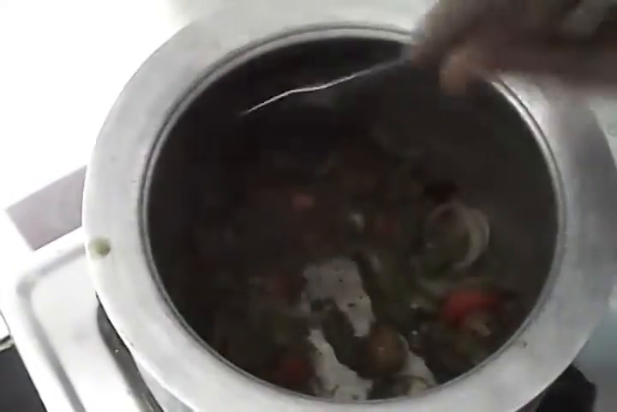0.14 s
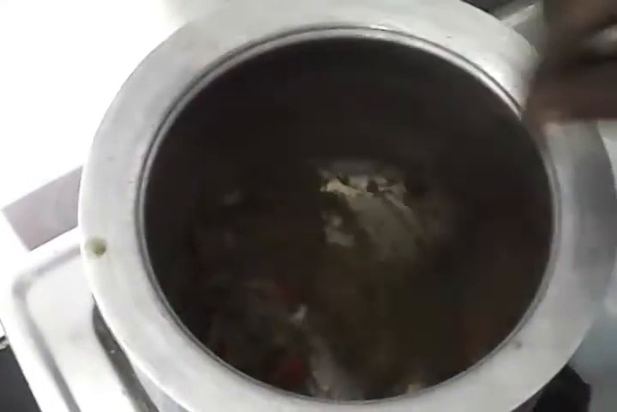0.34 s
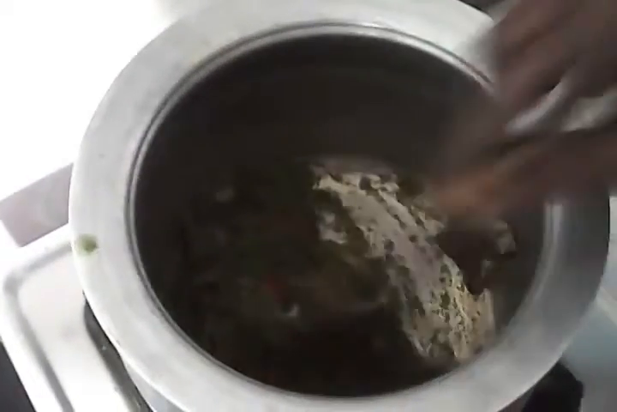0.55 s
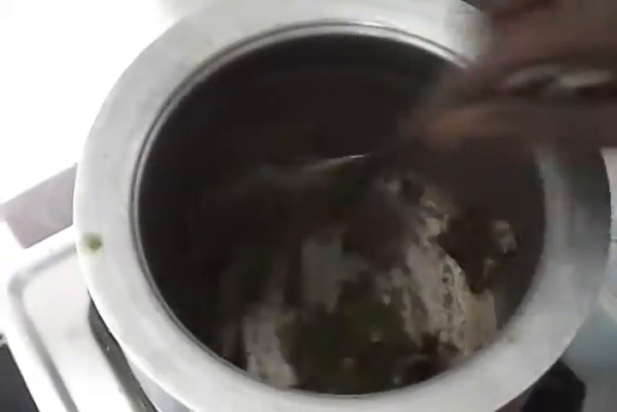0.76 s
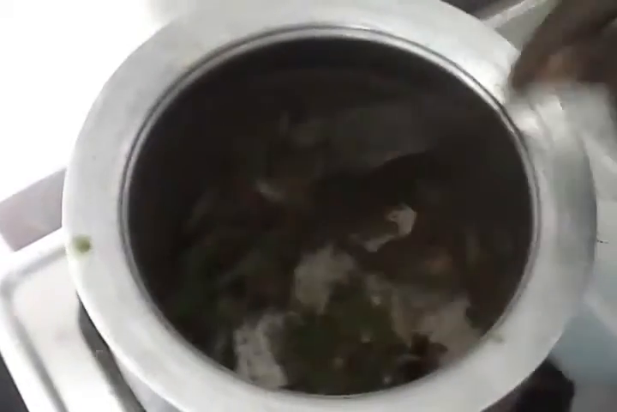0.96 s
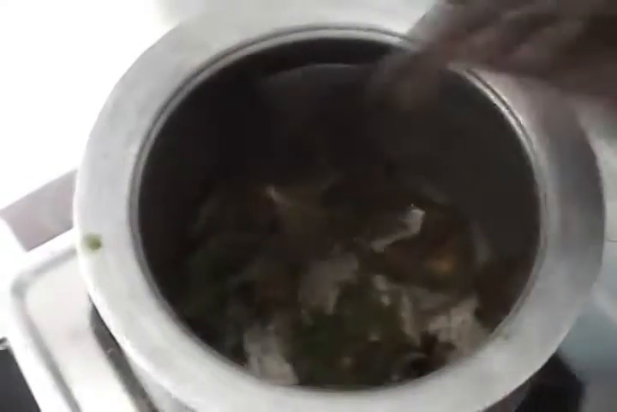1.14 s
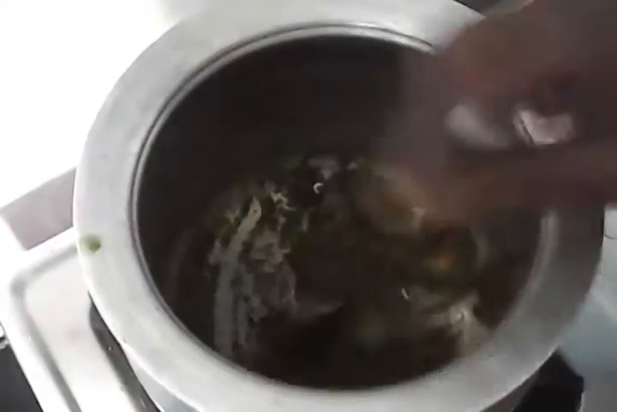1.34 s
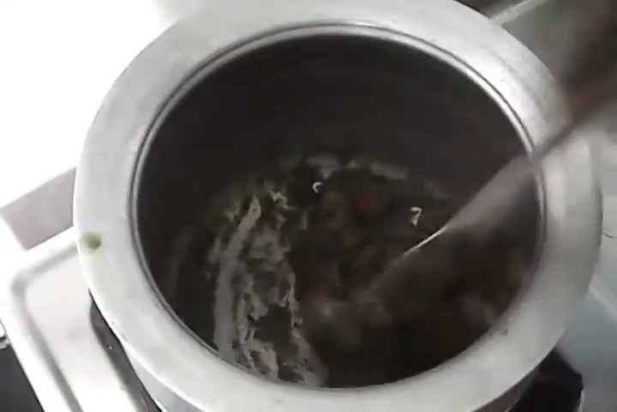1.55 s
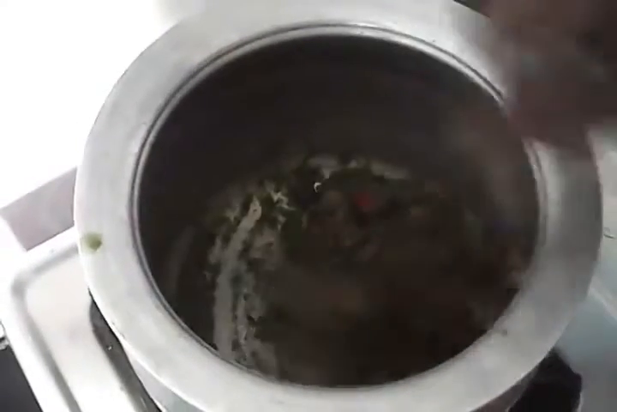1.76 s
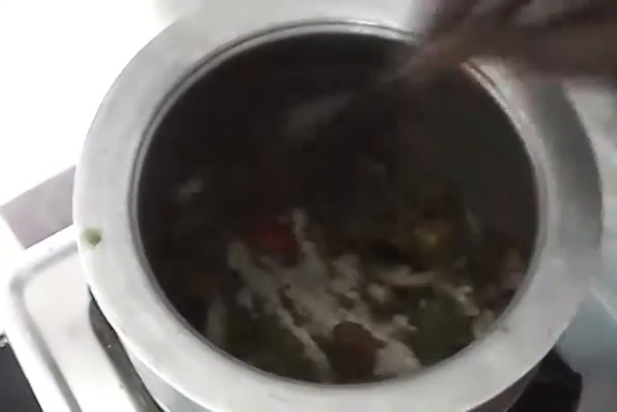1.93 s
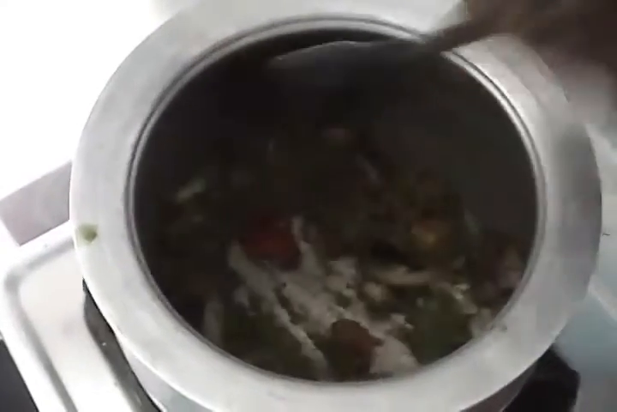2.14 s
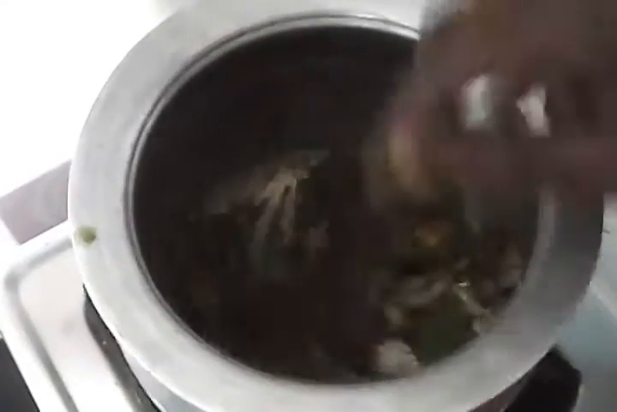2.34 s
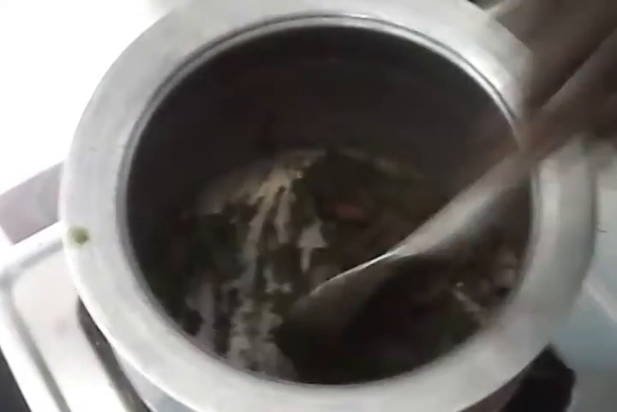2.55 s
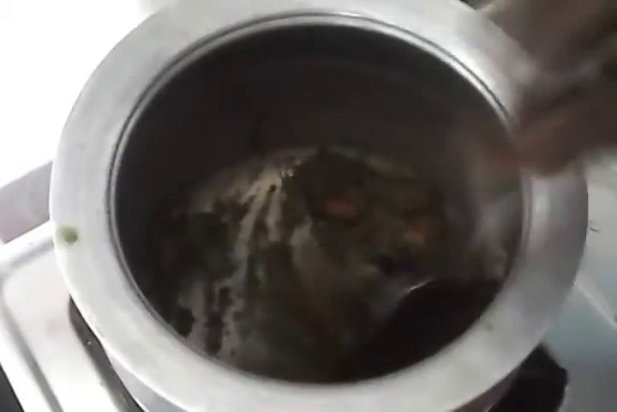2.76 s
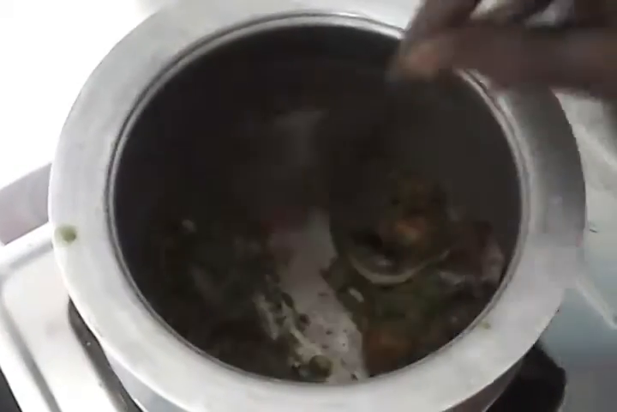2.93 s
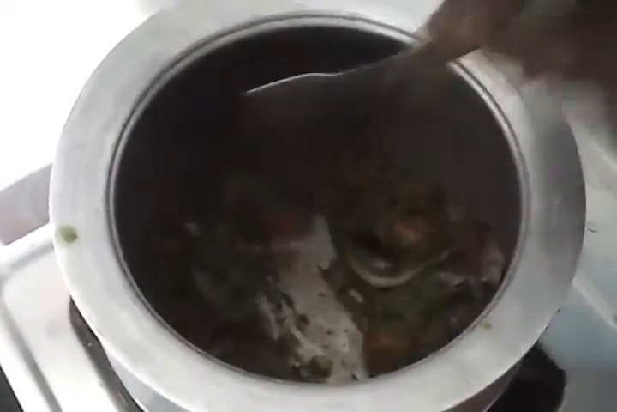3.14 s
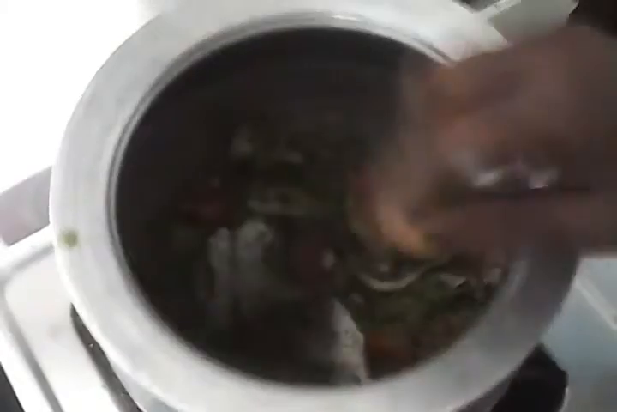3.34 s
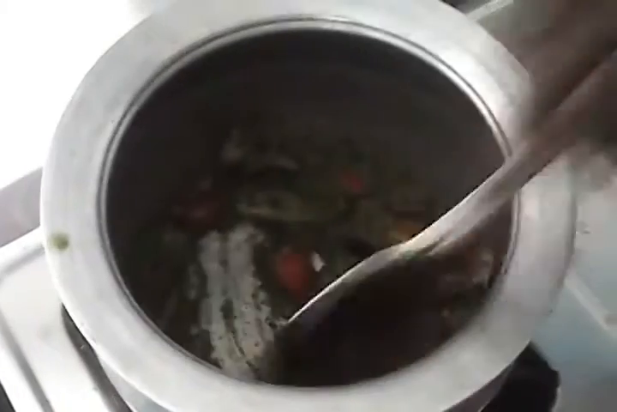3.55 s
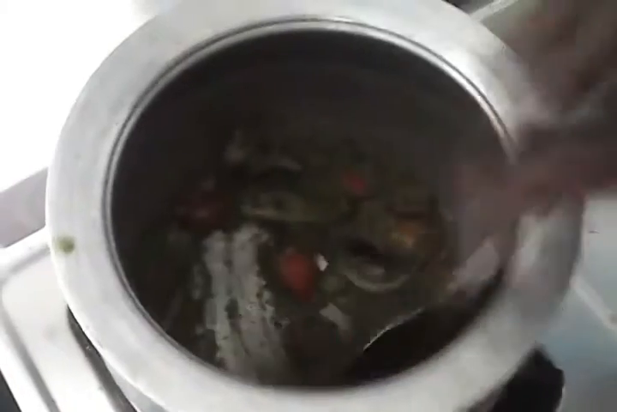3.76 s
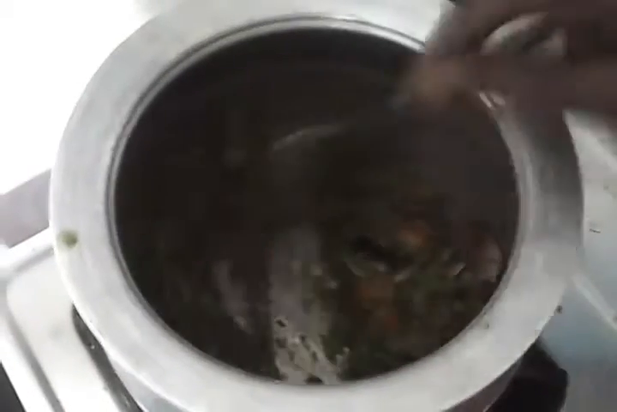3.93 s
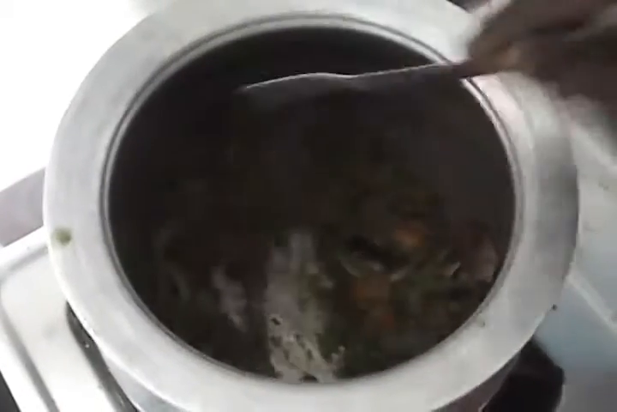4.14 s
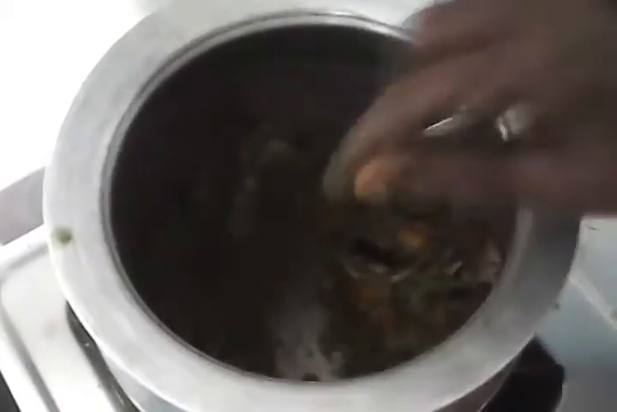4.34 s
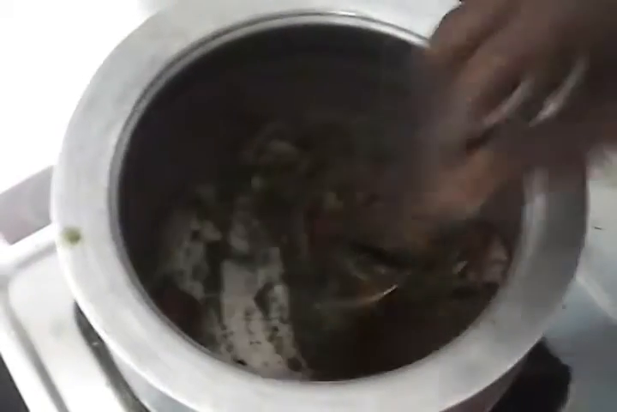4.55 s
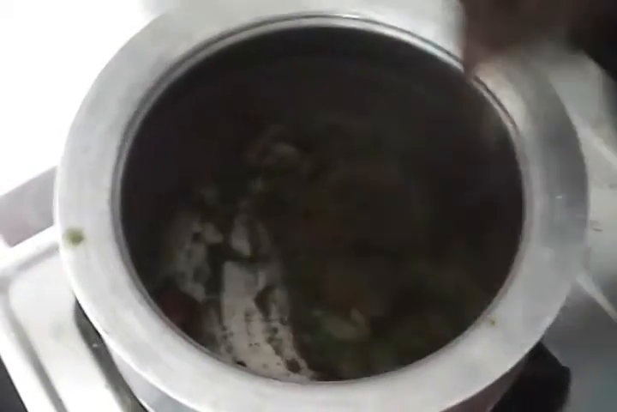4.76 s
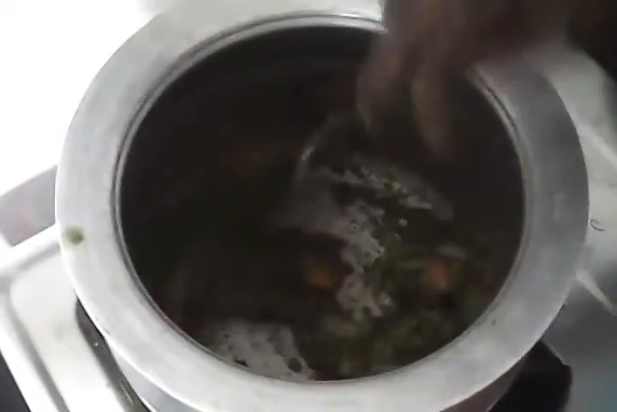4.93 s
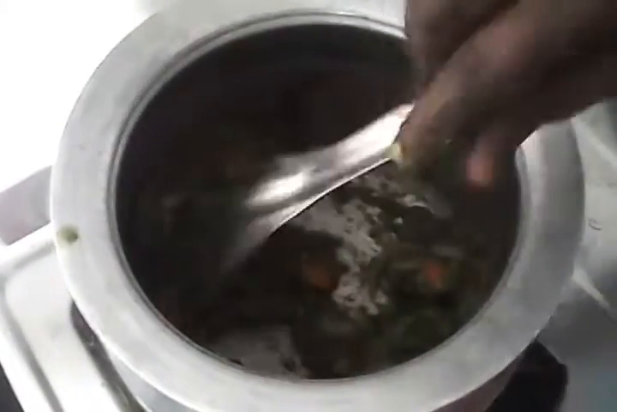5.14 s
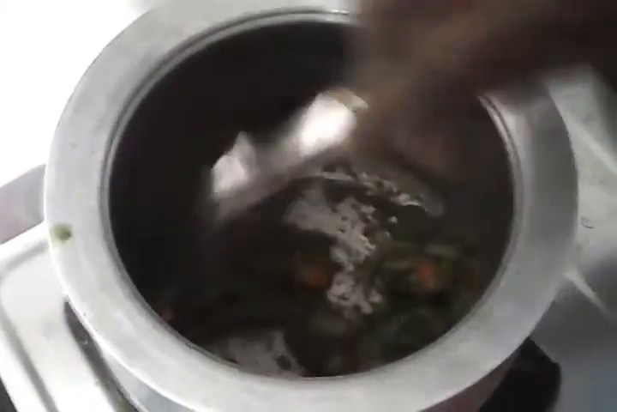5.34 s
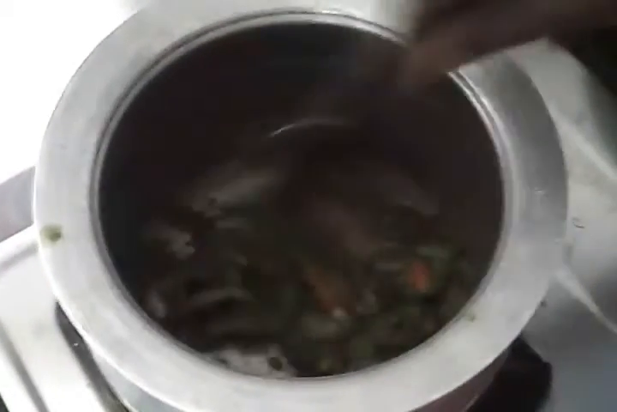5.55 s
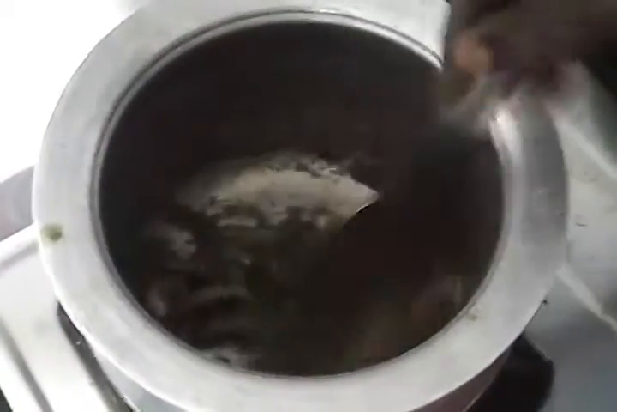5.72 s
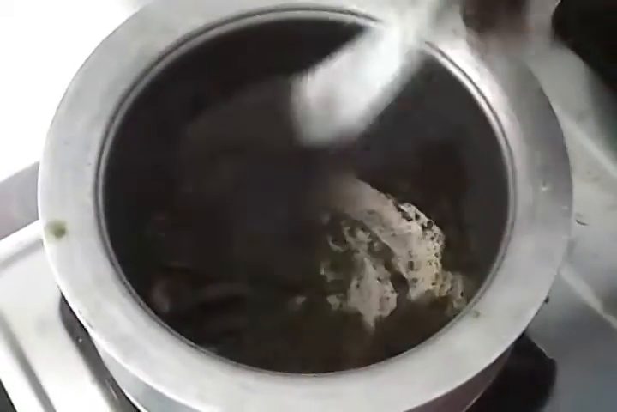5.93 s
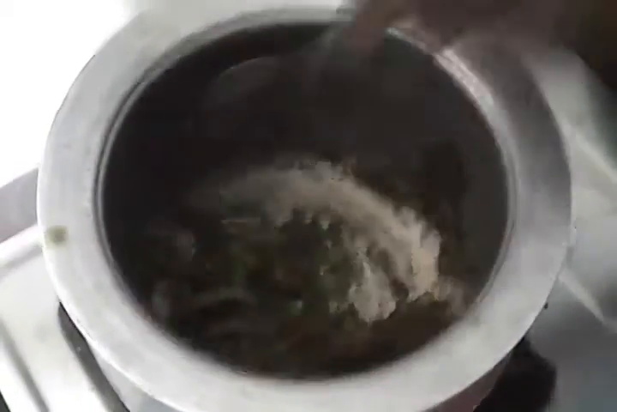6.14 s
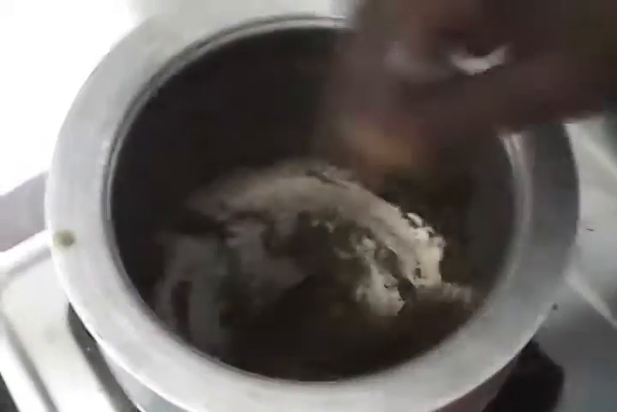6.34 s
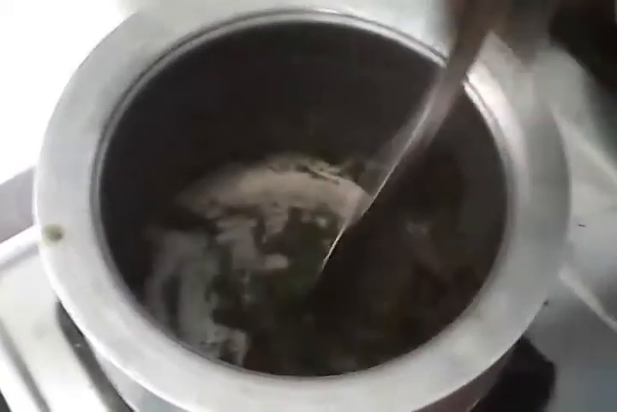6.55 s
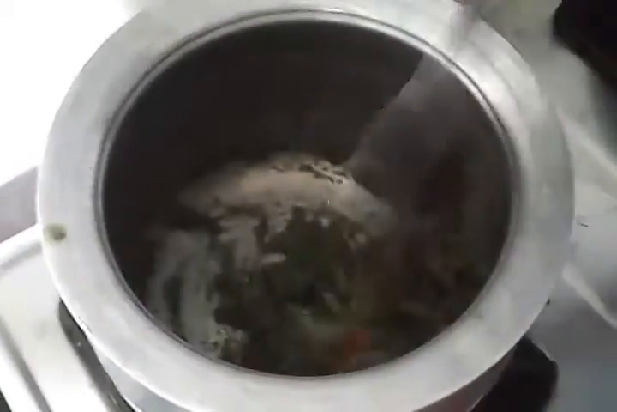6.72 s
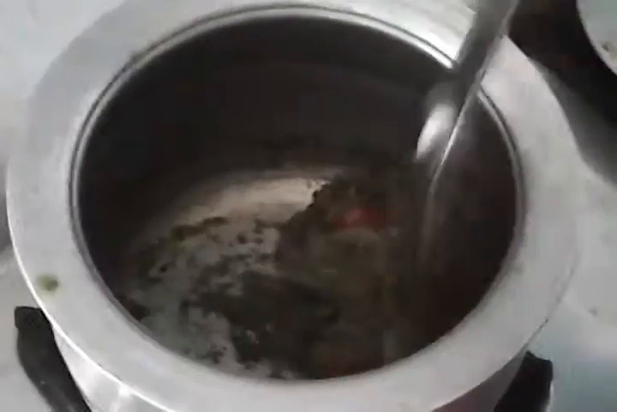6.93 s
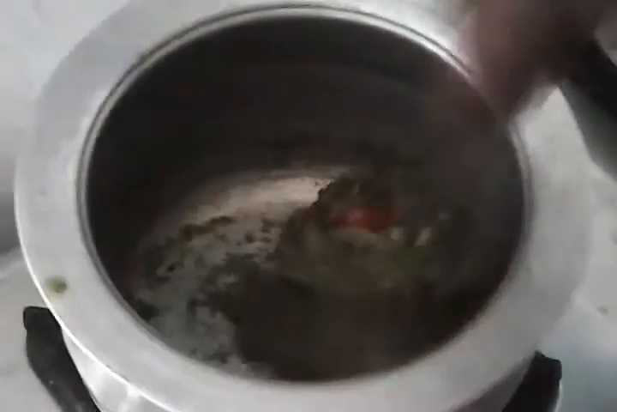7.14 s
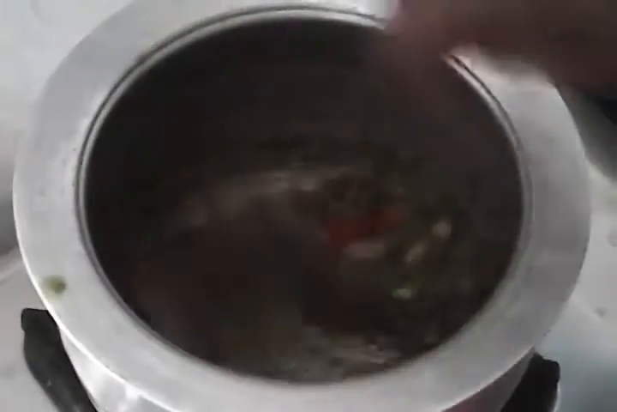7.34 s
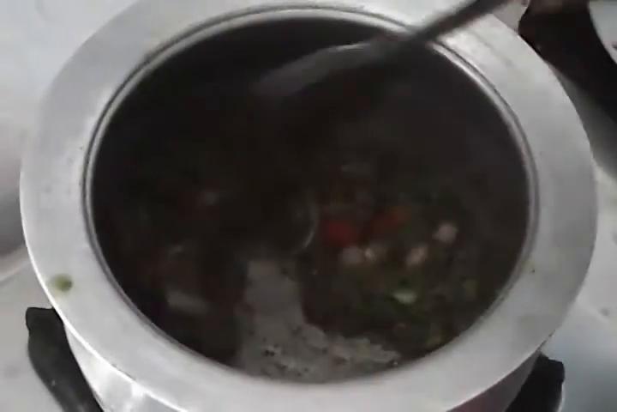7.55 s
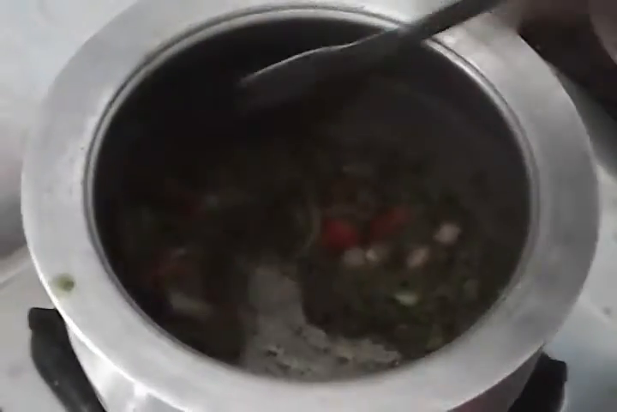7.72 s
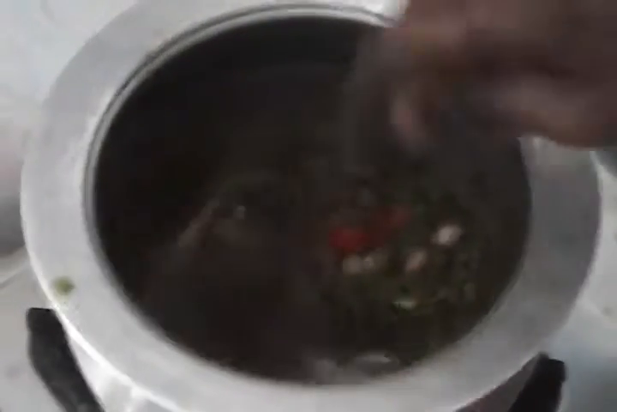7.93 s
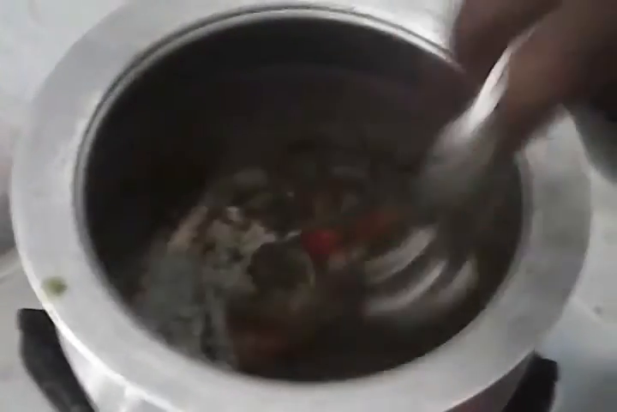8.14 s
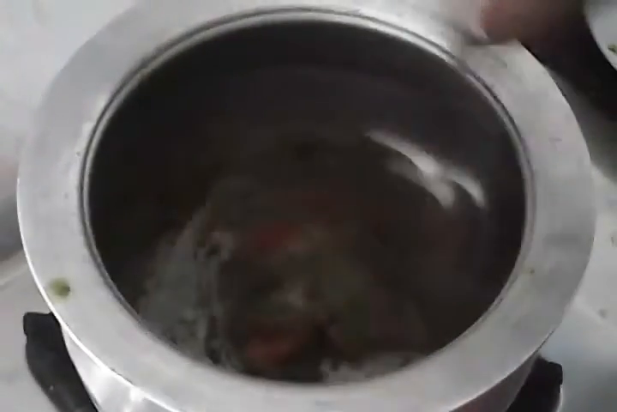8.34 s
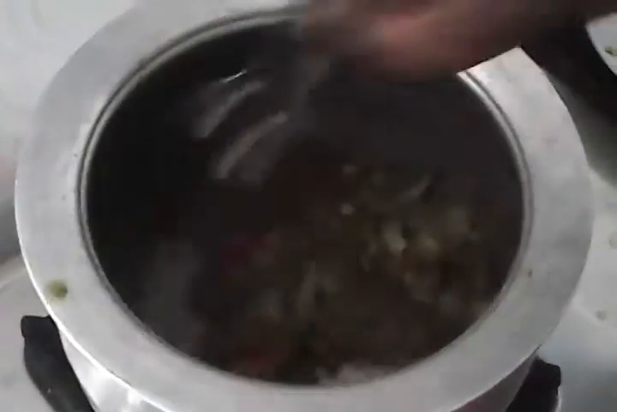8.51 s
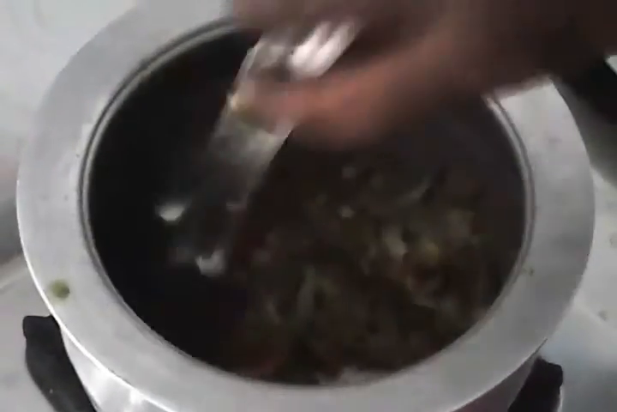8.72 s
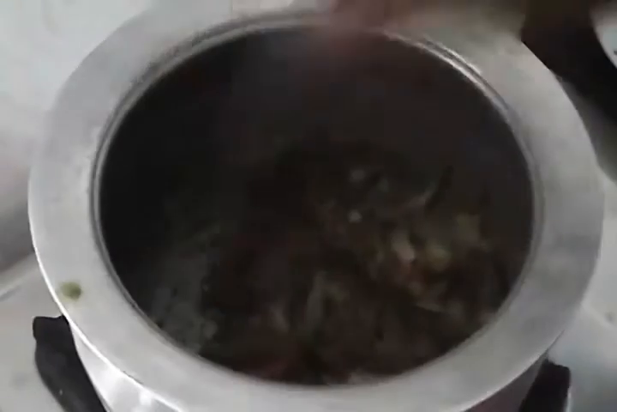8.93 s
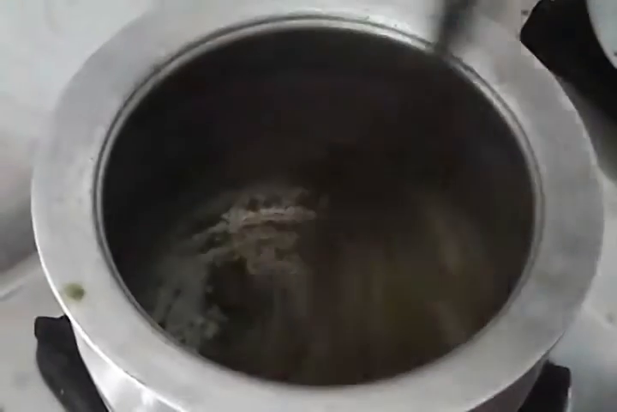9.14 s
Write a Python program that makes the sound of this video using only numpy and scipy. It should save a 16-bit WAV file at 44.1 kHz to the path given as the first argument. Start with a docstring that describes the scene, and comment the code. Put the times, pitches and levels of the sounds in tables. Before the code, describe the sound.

A metal spoon stirs vegetables in a thick metal pot, with hollow knocks, ringing clinks and short scrapes over a faint sizzle.

```python
"""A flat metal spoon stirs frying vegetables in a thick aluminium pot on a stove.
It knocks the base with a hollow thump, clinks on the ringing wall and drags over the bottom,
where stick-slip clicks shake the pot. A hard-walled kitchen echoes it all. Underneath, oil fizzes
and spits quietly, and a faint thin tone comes and goes twice. Near 6.7 s the sound drops out
for a tenth of a second and comes back at a lower gain."""
import sys
import numpy as np
from scipy import signal
from scipy.fft import rfft, irfft, next_fast_len
from scipy.io import wavfile
from scipy.ndimage import uniform_filter1d

SR = 44100
rng = np.random.default_rng(int(sys.argv[2]) if len(sys.argv) > 2 else 0)


def wav_out(sig):
    """Save sig, one row per channel (or a flat mono array), as 16-bit PCM at SR to the path in sys.argv[1]."""
    wavfile.write(sys.argv[1], SR, np.round(np.clip(np.atleast_2d(sig).T, -1, 1) * 32767).astype(np.int16))


N = 404830


def gain_of(db):
    """dB to gain."""
    return 10 ** (np.asarray(db) / 20)


def unit_rms(x):
    """Scales x to rms 1."""
    return x / np.sqrt(np.mean(x ** 2) + 1e-20)


def curve_at(points, hz):
    """Reads a curve on a log-frequency axis."""
    f, value = np.transpose(points)
    return np.interp(np.log(hz + 1), np.log(f + 1), value)


def fader(points):
    """A gain ride through points of seconds and dB."""
    return gain_of(np.interp(np.arange(N) / SR, *np.transpose(points)))


def add(mix, start, sound):
    """Mixes a sound in at a start time in seconds."""
    part = mix[round(start * SR):][:len(sound)]
    part += sound[:len(part)]


def coloured(x, eq):
    """Shapes x with an EQ curve of Hz and dB."""
    size = next_fast_len(len(x))
    gains = gain_of(curve_at(eq, np.fft.rfftfreq(size, 1 / SR)))
    return irfft(rfft(x, size) * gains, size)[:len(x)]


def bands(x, edges_hz=(), low_cut_hz=195):
    """Splits x into bands above a low cut, under which the pot radiates little."""
    cuts = [low_cut_hz, *edges_hz, None]
    out = []
    for lo, hi in zip(cuts, cuts[1:]):
        part = signal.sosfilt(signal.butter(4, lo, "high", fs=SR, output="sos"), x)
        out.append(signal.sosfilt(signal.butter(4, hi, fs=SR, output="sos"), part) if hi else part)
    return out


def decaying(x, t60s, ring_scale=1):
    """Lets every frequency of x die at its own speed."""
    hz, t, spectrum = signal.stft(x, SR, nperseg=256)
    decay = gain_of(-60 * t / (ring_scale * curve_at(t60s, hz)[:, None]))
    return signal.istft(spectrum * decay, SR, nperseg=256)[1][:len(x)]


def patchy(x, depth_db, bins, frames):
    """Makes the spectrum swell and sink in random patches; returns rms 1."""
    spectrum = signal.stft(x, SR, nperseg=512)[2]
    patches = uniform_filter1d(rng.standard_normal(spectrum.shape), bins, 0)
    patches = unit_rms(uniform_filter1d(patches, frames, 1))
    return unit_rms(signal.istft(spectrum * gain_of(depth_db * patches), SR, nperseg=512)[1][:len(x)])


def grit(per_s, spread_db):
    """A bed of clicks of random sign and very uneven size."""
    hit, size, sign = rng.random((N, 3)).T
    return (hit < per_s / SR) * gain_of(-spread_db * np.log(size + 0.02)) * np.sign(sign - .5)


def modes(table, length, ring_scale, spread_db=0):
    """Dying sines; the place of contact shifts each mode's level and detunes it a little."""
    t = np.arange(length) / SR
    hz, db, t60 = np.transpose(table)[:, :, None]
    place, phase, detune = rng.standard_normal((len(table), 3)).T[:, :, None]
    level = gain_of(db + spread_db * place - 60 * t / (ring_scale * np.clip(t60, .03, .9)))
    hz = hz * (1 + .0015 * detune)
    return (level * np.sin(2 * np.pi * hz * t + 0.49 * phase)).sum(0)


# The room's decay. Each row: frequency in Hz, t60 in seconds.
KITCHEN_T60 = [(120, 1), (330, 0.47), (870, 0.65), (2300, 0.42), (6000, 0.44), (12000, 0.37)]
def kitchen_echo(x):
    """Hard walls return sparse echoes of random sign, each band dying at its own speed."""
    taps = np.zeros(SR)
    slots = np.arange(180, SR - 20, 20)
    taps[slots + rng.integers(0, 20, len(slots))] = rng.choice([-1., 1.], len(slots))
    tail = decaying(taps, KITCHEN_T60)
    return signal.fftconvolve(x, tail / np.linalg.norm(tail))[:N]


# Faint tones. Each row: start in seconds, length in seconds, pitch in Hz, level in dB.
THIN_TONES = [(3.84, 0.18, 1600, -60), (8.17, 0.17, 1610, -58), (8.168, 0.15, 3350, -62)]
def thin_tones():
    """Each sine wavers a little under a smooth swell."""
    out = np.zeros(N)
    for start, seconds, hz, db in THIN_TONES:
        length = round(seconds * SR)
        waver = 1 + 0.0018 * unit_rms(uniform_filter1d(rng.standard_normal(SR // 4), 600))[:length]
        swell = gain_of(db) * np.hanning(length) ** .5
        add(out, start, swell * np.sin(2 * np.pi * hz * np.cumsum(waver) / SR))
    return out


# The colour of the fizz. Each row: frequency in Hz, level in dB.
FIZZ_EQ = [(18, -71.5), (30, -14), (104, 0.5), (134, 2), (441, 3.5), (1210, -6), (1450, -8), (1570, -10.5),
           (2140, -7.5), (3150, -12.5), (11200, -9), (13400, -14.5), (14500, -21.5)]
# The ride on fizz and crackle. Each row: time in seconds, level in dB.
FRYING_FADER = [(0, -61.5), (1, -66.5), (2.698, -68.5), (4.4, -70), (5.5, -69.5), (6.5, -70), (6.9, -53.5),
                (7.7, -53), (8.35, -53), (9.18, -55.5)]
# Spits that poke out of the fizz. Each row: start in seconds, level in dB.
OIL_SPITS = [(2.4553, -49), (8.1794, -28), (8.2454, -32), (8.297, -28), (9.016, -31), (9.048, -34),
             (9.06, -36), (9.0855, -27.5)]
def frying():
    """Tiny bubbles in the oil make a patchy fizz, a fine crackle and a few louder spits."""
    fizz = patchy(coloured(rng.standard_normal(N), FIZZ_EQ), 1.6, bins=5, frames=6)
    t = np.arange(200) / SR
    pop = np.sin(2 * np.pi * 8500 * t) * np.exp(-t / 0.00015)
    pop /= abs(pop).max()
    crackle = unit_rms(signal.oaconvolve(grit(per_s=280, spread_db=1.9), pop)[:N])
    out = fader(FRYING_FADER) * (fizz + gain_of(-23) * crackle)
    for start, db in OIL_SPITS:
        add(out, start, gain_of(db) * pop)
    return out


# The ring of the base, the wall (grouped in families of close neighbours) and the spoon.
# Each row: frequency in Hz, level in dB, t60 in seconds before scaling.
BASE_MODES = [(238, -2, .6), (314, -2, .4), (380, -8, .3), (425, -7, .35), (480, 0, .5), (515, -6, .45),
              (567, -3, .55), (690, -13, .35), (785, -13, .3), (873, -10, .3), (966, -14, .35)]
WALL_FAMILIES = [
    [(516, -5.5, 0.37), (571.4, 3.5, 0.51)],
    [(904, 0.5, 0.73), (1002, 1.5, 0.14), (1110, -1, 0.53)],
    [(1213, 10.5, 0.18), (1350, 0.5, 0.87)],
    [(1640, -9.5, 0.22)],
    [(1880, -6.5, 0.29), (1952, 2.5, 0.43), (2018, -2, 0.14)],
    [(2190, 3.5, 0.14), (2254, -4, 0.17), (2270, 13.5, 0.053)],
    [(2926, 2.5, 0.11), (2934, -2.5, 0.18)],
    [(3036, -4, .3), (3066, 0, .32)],
    [(3700, -5, .4), (3822, -2, .4), (3862, 0, .35), (3930, -6, .2)],
    [(3985, -8, .15), (4107, 0, .27), (4320, -12, .25)],
    [(5260, -21, 0.099), (5460, -13.5, 0.17), (5180, -13.5, .15)],
]
SPOON_MODES = [(5200, -34, 0.6), (6770, -3.5, 0.12), (7350, -17, 0.9), (7060, -2, 0.065), (7600, 2, 0.033),
               (7810, 11.5, 0.11), (9400, -5, 0.42), (8500, -10.5, 0.76), (9460, -25, 0.14),
               (9100, -13, 0.057), (9900, -15, 0.37), (10900, -19, 0.166), (11340, -11, 0.29),
               (12620, -24, .3)]
# The wash of the pot's countless weak modes, and the rasp of the spoon's edge.
# Each row: frequency in Hz, level in dB.
WASH_EQ = [(35, -79.5), (60, -66.5), (222, -14), (403, -3), (485, -5.5), (638, -5), (1190, -17),
           (2470, -24.5), (10000, -36), (13200, -39.5), (14500, -71)]
RASP_EQ = [(1760, -9), (3000, -15), (4140, -6), (8950, -1), (11500, -6.5), (13600, -12.5), (14200, -15),
           (14500, -41)]
def drag_layers():
    """Stick-slip clicks drive the damped pot: boom, rumble, grind and rasp, each at rms 1."""
    slips = unit_rms(grit(per_s=700, spread_db=3.2)) + .5 * rng.standard_normal(N)
    base = signal.oaconvolve(slips, modes(BASE_MODES, SR // 4, ring_scale=0.94))[:N]
    wall = signal.oaconvolve(slips, modes(sum(WALL_FAMILIES, []), SR // 4, ring_scale=0.15))[:N]
    body = 1.04 * unit_rms(base) + 0.37 * unit_rms(wall) + unit_rms(coloured(slips, WASH_EQ))
    boom, rumble, grind = bands(body, edges_hz=(400, 1100, 4800))[:3]
    edge = unit_rms(grit(per_s=4000, spread_db=3.5)) + 0.47 * rng.standard_normal(N)
    spoon = signal.oaconvolve(slips, modes(SPOON_MODES, SR // 8, ring_scale=0.037))[:N]
    rasp = unit_rms(coloured(edge, RASP_EQ)) + 0.27 * unit_rms(spoon)
    # the edge catches on scraps of food, so the colour keeps changing
    grind = patchy(grind, 3.2, bins=5, frames=3)
    rasp = patchy(rasp, 2.8, bins=12, frames=4)
    rumble = patchy(rumble, 3.6, bins=2, frames=6)
    return np.array([unit_rms(boom), rumble, grind, rasp])


# How fast a push lets go, in dB per second, for boom, rumble, grind and rasp.
PUSH_RELEASES = [97, 127.4, 184, 192]
# Pushes over the bottom. Each row: start and hold in seconds, then pressure, boom and rasp in dB.
PUSHES = [(0.158, 0.073, -37, -38.5, -55), (0.597, 0.01, -37.5, -39, -66), (1.1, 0.011, -32, -35.5, -56),
          (1.207, 0.089, -22, -26, -43.5), (1.607, 0.014, -21, -30, -31.5),
          (1.776, 0.24, -40.5, -42, -70.5), (2.036, 0.034, -40, -48.5, -36.5), (2.119, 0.01, -25, -28, -56),
          (2.236, 0.013, -31, -56.5, -43.5), (2.62, 0.029, -44.5, -64.5, -80),
          (3.041, 0.069, -34.5, -40, -45), (3.183, 0.056, -34, -37, -47.5), (3.327, 0.017, -52, -47, -64),
          (3.447, 0.077, -37, -38, -48), (3.561, 0.082, -32, -34, -45), (3.71, 0.021, -40.5, -54, -99),
          (4.036, 0.032, -36, -42, -35.5), (4.078, 0.019, -24.5, -46, -54.5),
          (4.192, 0.026, -26.5, -29, -40.5), (4.617, 0.038, -18, -21.5, -37.5),
          (4.794, 0.031, -44, -48, -66), (5.121, 0.086, -27.5, -39, -41), (5.22, 0.039, -29, -32.5, -55.5),
          (5.652, 0.0073, -19.5, -27, -37.5), (5.729, 0.029, -33.5, -37, -40),
          (6.131, .03, -19.5, -26, -45.5), (6.246, 0.04, -31, -34, -44.5), (6.65, 0.049, -26, -33, -43),
          (7.211, 0.027, -17.5, -31, -21.5), (7.289, 0.14, -26.5, -40, -31), (7.88, 0.035, -23, -45, -28.5),
          (7.942, 0.17, -14, -17, -22), (8.614, 0.078, -20.5, -31.5, -29), (8.814, 0.038, -29.5, -37, -40)]
def spoon_drags(attack_s=0.022, sag_db_per_s=59.5):
    """Each push rises, sags as it holds, and lets go; its pressure sets the rumble."""
    envelopes, t = np.zeros((4, N)), np.arange(0, .8, 1 / SR)
    for start, hold, pressure_db, boom_db, rasp_db in PUSHES:
        grind_db = pressure_db + 0.47 * (rasp_db - pressure_db) - 5.5  # follows pressure and rasp
        held = np.minimum(t / attack_s, 1) * gain_of(-sag_db_per_s * np.minimum(t, hold))
        levels_db = boom_db, pressure_db, grind_db, rasp_db
        for envelope, db, release in zip(envelopes, levels_db, PUSH_RELEASES):
            add(envelope, start, held * gain_of(db - release * np.maximum(t - hold, 0)))
    return (envelopes * drag_layers()).sum(0)


def struck(layers, levels_db, contact_ms):
    """Balances a hit's layers by their first 20 ms; the force builds up during the contact."""
    early = round(.02 * SR)
    sound = sum(gain_of(db) * layer / np.std(layer[:early]) for db, layer in zip(levels_db, layers))
    t = np.arange(len(sound)) / SR
    attack = np.minimum(t * 1000 / max(contact_ms, .3), 1)
    fade_out = np.minimum(20 * (t[-1] - t), 1)
    return sound * attack * fade_out


# The noisy part of the spoon's tick. Each row: frequency in Hz, level in dB.
TICK_EQ = [(470, -26), (800, -6), (2560, -12.5), (3070, -2.5), (3470, -15), (4060, -12), (4810, -12),
           (10200, -5.5), (14500, -12.5)]
# The mix of the wall's families. Each row: trim in dB, then how far that family follows
# the hum, clank, bell and high ring settings.
FAMILY_MIX = [(-3, 0.93, 0, 0.0037, 0.045), (-0.5, 0.1, 1, 0.031, 0.07), (-6, 0, 0.9, 0.16, 0),
              (-11, 0, 0.95, 0.14, 0), (-21.5, 0.082, 0.066, 0, 0), (-20.5, 0.0038, 0, 0, 0),
              (-12.5, 0.27, 0.094, .45, 0.074), (-1.5, 0.015, 0.018, 1, 0.038), (-3.5, 0.1, 0, 0, 0.92),
              (1, 0.046, 0.23, 0.038, 0.99), (-19, 0.33, 0.52, 0.61, 0.65)]
def clink(free_s, strength_db, hum_db, clank_db, bell_db, high_db, tick_db, ring_scale, contact_ms):
    """The spoon's edge sets the wall ringing, with a dull thud and a bright tick."""
    length = round(.4 * SR)
    t = np.arange(length) / SR
    noise, flutter = rng.standard_normal((length, 2)).T
    tick_decay = np.exp(-t / 0.0029) + 0.27 * np.exp(-t / (0.034 * ring_scale))
    tick = unit_rms(coloured(noise, TICK_EQ)) * tick_decay
    tick += gain_of(-11) * modes(SPOON_MODES, length, .5 * ring_scale, spread_db=4.5)
    thud = bands(coloured(noise, WASH_EQ), edges_hz=[400])[0] * np.exp(-t / 0.024)
    # the ring drops fast while the spoon still touches, and is choked after free_s
    choke = (1 + 0.6 * np.exp(-t / 0.017)) * gain_of(-350 * np.maximum(t - free_s, 0))
    rough = 1 + 0.45 * unit_rms(uniform_filter1d(flutter, 250))  # food on the wall roughens the ring
    rings = [modes(family, length, ring_scale, spread_db=3.3) * choke * np.roll(rough, 999 * k)
             for k, family in enumerate(WALL_FAMILIES)]
    rings_db = np.dot(FAMILY_MIX, [1, hum_db, clank_db, bell_db, high_db])
    return struck([thud, *rings, tick], strength_db + np.array([-29, *rings_db, tick_db]), contact_ms)


# Hits on the wall. Each row: start in seconds, strength in dB, trims in dB for low hum, clank, bell,
# high ring and tick, ring length as a factor, contact in ms.
WALL_CLINKS = [(.001, -32, -20, -23, -13, -25.5, -24, .99, 0.34),
               (.514, -21.5, -29, -19, -7.5, -24, -21, 0.46, 2.8),
               (.921, -14.5, -32, -30, -14, -28, -20, 0.56, 3.7),
               (1.443, -17, -8.5, -21.5, -27, -21, -9.5, .99, 2.5),
               (1.52, -19.5, -12, -15.5, -14, -28.5, -20.5, 0.72, 2.9),
               (1.721, -28, -39, -12, -23, -37, -20, .32, 1.9),
               (1.749, -32, -32, -14, -32, -47, -15, 0.27, 1.7),
               (1.926, -18.5, -27, -22.5, -9.5, -28, -20, 0.4, 1.2),
               (2.016, -19.5, -24, -29, -18, -26.5, -15.5, 0.33, 1.3),
               (2.052, -17.5, -30, -26, -23, -54, -13.5, 0.87, 3),
               (3.046, -9.5, -25.5, -33.5, -27, -41, -18.5, 0.3, 2.5),
               (3.544, -31.5, -28, -15, -24, -41, -18.5, 0.88, 3.7),
               (3.79, -18.5, -24, -25.5, -19.5, -24, -25, 0.58, 2.1),
               (4.015, -16.5, -26, -21, -38, -44, -14, 0.36, 2.5),
               (4.528, -17.5, -22, -18, -9, -18.5, -14, 0.56, 2.8),
               (5.005, -12, -36, -36.5, -16, -24, -21.5, 0.55, 2.1),
               (5.053, -21.5, -23, -22, -17.5, -25.5, -15.5, 0.88, 4.1),
               (6.563, -17, -15.5, -23.5, -11.5, -22.5, -12, 0.66, 8),
               (7.098, -26.5, -8, -19.5, -12.5, -16, 1.5, 0.91, 5.7),
               (7.856, -7.5, -20.5, -30.5, -11, -21.5, -5, 0.25, 5.4),
               (7.871, -16, -10, -19, -30, -13, 1.7, 0.24, 3.1),
               (8.417, -7.5, -25.5, -35, -21, -22.5, -16, 0.8, 3.9),
               (8.594, -17, -30, -25, -37, -43, -11, .53, 2.1),
               (8.864, -31, 4.5, -15, -19, -30, -1.5, 1, 6.2)]
def wall_clinks(landing_times):
    """The wall rings after each clink until the spoon next lands on the base."""
    out, landings = np.zeros(N), np.array([*landing_times, N / SR])
    for start, *settings in WALL_CLINKS:
        free_s = landings[landings > start][0] - start
        add(out, start, clink(free_s, *settings))
    return out


# Crossovers in Hz that split a knock into boom, four hollow bands, two clack bands and tick.
KNOCK_CROSSOVERS = [275, 350, 450, 540, 640, 1100, 4800]
# Trims in dB for the lower and the upper clack band.
CLACK_TRIMS = [-11, -20]
def knock(strength_db, pitch_hz, boom_db, tick_db, outer_db, ring_scale, contact_ms):
    """The base's modes ring over a wash of weak ones and a short crack, balanced band by band."""
    hollow_hz = np.sqrt(np.multiply(KNOCK_CROSSOVERS[:4], KNOCK_CROSSOVERS[1:5]))
    octaves = np.log2(hollow_hz / pitch_hz)
    hollow_db = -10.5 - np.maximum(22 * octaves, -16.5 * octaves)  # rolls off either side of the pitch
    hollow_db[[0, -1]] += outer_db
    levels_db = strength_db + np.array([boom_db, *hollow_db, *CLACK_TRIMS, tick_db])
    length = round(.4 * SR)
    t = np.arange(length) / SR
    wash = base_wash(t, ring_scale)
    ring = modes(BASE_MODES, length, .95 * ring_scale, spread_db=1.5) * (1 + .6 * np.exp(-t / .01))
    body = struck(bands(wash + gain_of(8) * ring, KNOCK_CROSSOVERS), levels_db, contact_ms)
    # the base dents and springs back
    punch = bands(np.sin(2 * np.pi * 520 * t) * np.exp(-t / 0.0027))[0]
    hardness = 2.46 / max(contact_ms, 1.5)
    return body + hardness * gain_of(strength_db - 7) * punch


# The decay of the weak modes. Each row: frequency in Hz, t60 in seconds before scaling.
WASH_T60 = [(150, 0.5), (500, 0.83), (1500, 0.83), (4000, 0.022), (9000, 0.15)]
def base_wash(t, ring_scale):
    """A knock wakes all the weak modes at once: a short crack, then a dying wash."""
    noise = unit_rms(coloured(rng.standard_normal(len(t)), WASH_EQ))
    crack = 2 * noise * np.exp(-t / 0.00046)
    return crack + decaying(noise, WASH_T60, ring_scale)


# Hits on the base. Each row: start in seconds, strength in dB, hollow pitch in Hz, trims in dB for
# boom, tick and the outer two hollow bands, ring length as a factor, contact in ms.
BASE_KNOCKS = [(.145, -20, 432, -19.5, -28, 4, 0.74, 6.4), (.196, -15.5, 430, -16, -34, 1.5, 0.49, 2.9),
               (.615, -26, 440, -13.5, -32, -1, 0.84, 0.73), (1.095, -19.5, 418, -30, -20, -5, 0.27, 4.2),
               (1.214, -13.5, 540, -23.5, -27, -5, 0.86, 4.5), (1.609, -10, 388, -32, -13.5, 2, 0.34, 3.1),
               (2.13, -16, 514, -18.5, -20.5, -8, 0.51, 7.5), (2.243, -19, 430, -26, -17, 0.5, 0.6, 3.2),
               (2.616, -33.5, 432, -21, -48, 0, 0.78, 1.7), (3.186, -23, 493, -17, -23, 3.5, 0.28, 3.3),
               (3.401, -37, 392, -32, -23, -6, 1.3, 3.2), (3.439, -29.5, 386, -22, -38, -9, 0.33, 0.82),
               (3.458, -24.5, 383, -21, -32, 2, 0.63, 2.4), (3.692, -26, 392, -32, -27, 0, 0.2, 3.4),
               (4.08, -20.5, 493, -28, -38, -6, .4, 2.5), (4.093, -15.5, 494, -29, -41, -7, 0.35, 3.7),
               (4.13, -22.5, 484, -22, -22.5, -2, 1.4, 5.8), (4.614, -5.5, 512, -25.5, -20, -10, 0.45, 2),
               (5.118, -16.5, 471, -21.5, -24, -0.5, 1.17, 3.8),
               (5.657, -5.5, 489, -30, -31.5, 0.5, 0.28, 4.9), (6.13, -5, 440, -23, -25.5, -3, 0.43, 2.8),
               (6.242, -10.5, 450, -18, -36, 4, 0.82, 8.4), (6.656, -10, 485, -26, -26, -2, 0.24, 3.3),
               (7.215, -1.2, 510, -16, -12.5, -23, 0.88, 5.7), (7.929, -19, 497, -43, -29, -9, .52, 1.1),
               (7.941, -6.5, 482, -28, -24, 8, 0.91, 0.56), (8.609, -13.5, 480, -24, -6.5, -6, 0.89, 5.9),
               (8.68, -15, 470, -32.5, -27, 1.5, 0.57, 0.69), (8.754, -24.5, 531, -20, -12, -9, 1.2, 1.1),
               (8.817, -23.5, 394, -26, -7.5, 4, 0.9, 3.3)]
def base_knocks(jolt_period_s=.009):
    """Two tracks: the spoon landing on the base, and the stove top's low jolt under each knock."""
    knocks, jolts = np.zeros((2, N))
    cycles = np.arange(0, 6, 1 / (jolt_period_s * SR))
    jolt = np.sin(2 * np.pi * cycles) * np.exp(-cycles)
    for start, strength_db, *settings in BASE_KNOCKS:
        add(knocks, start, knock(strength_db, *settings))
        add(jolts, start, gain_of(strength_db - 42) * jolt)
    return knocks, jolts


def scene():
    """Mono mix: the spoon in the pot and its echo, over dry jolts, frying and tones."""
    clinks = wall_clinks(landing_times=[row[0] for row in BASE_KNOCKS])
    knocks, jolts = base_knocks()
    drags = spoon_drags()
    direct = gain_of(-6.5) * (knocks + clinks) + gain_of(-11.5) * drags
    echo_send = gain_of(-13) * knocks + gain_of(-11) * clinks + gain_of(-20.5) * drags
    pot = bands(direct + kitchen_echo(echo_send))[0]  # low cut only
    return (pot + jolts + frying() + thin_tones())[None]


# The master ride, 9 dB lower after the dropout than before. Each row: time in seconds, gain in dB.
DROPOUT_FADER = [(6.72, 10.5), (6.72, -13), (6.739, -19), (6.75, -80), (6.811, -90), (6.817, 1.5)]
def record(dry, high_cut_hz=14100):
    """The sound drops out once, and a steep low-pass takes off the top."""
    low_pass = signal.firwin(511, high_cut_hz, window=("kaiser", 9), fs=SR)
    return signal.oaconvolve(dry * fader(DROPOUT_FADER), low_pass[None], "same")


dry = scene()
out = record(dry)
wav_out(out)
```